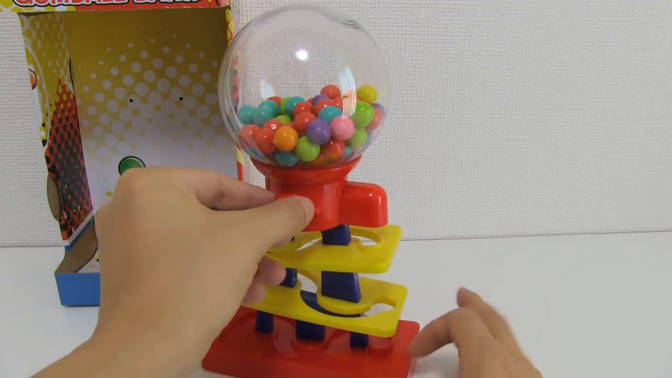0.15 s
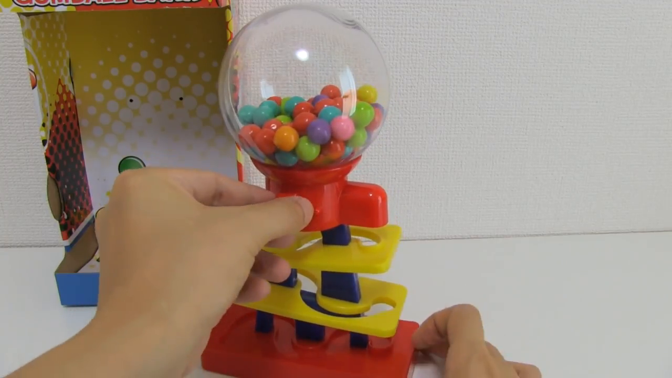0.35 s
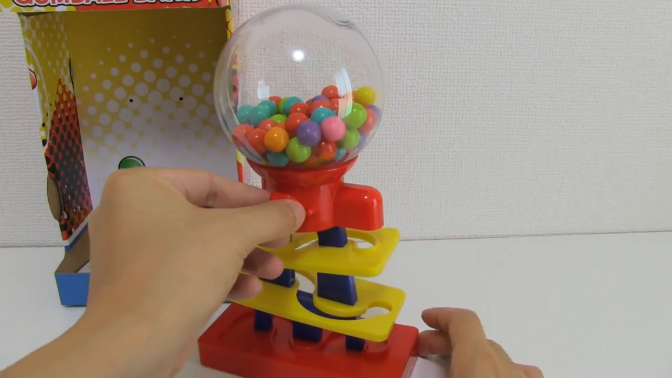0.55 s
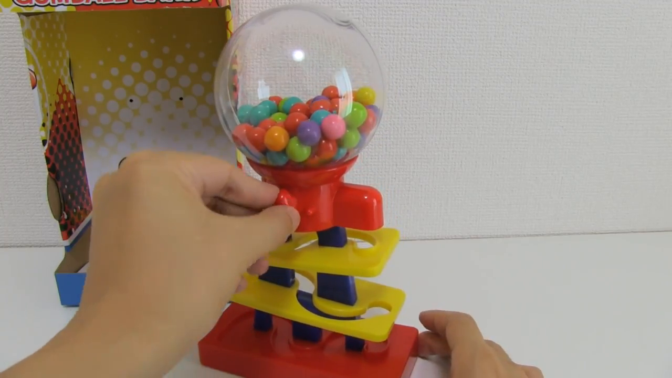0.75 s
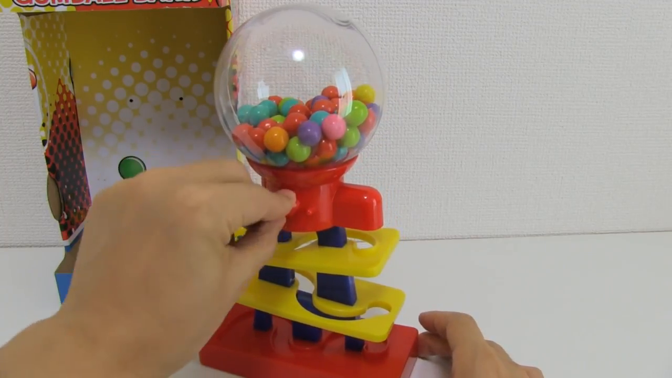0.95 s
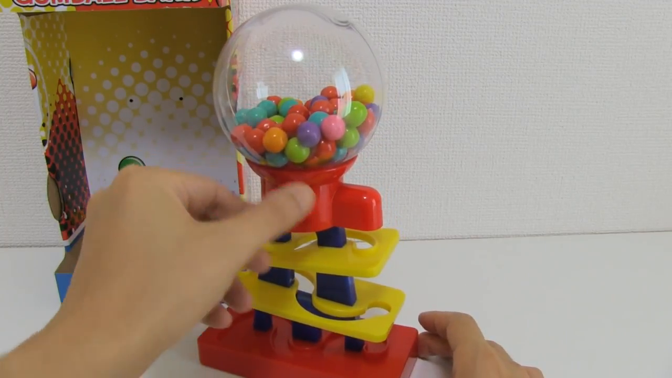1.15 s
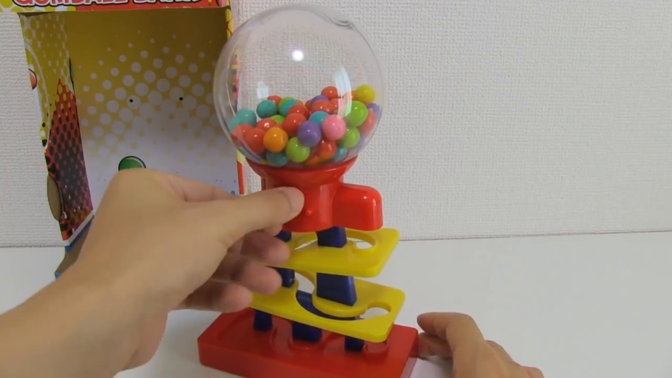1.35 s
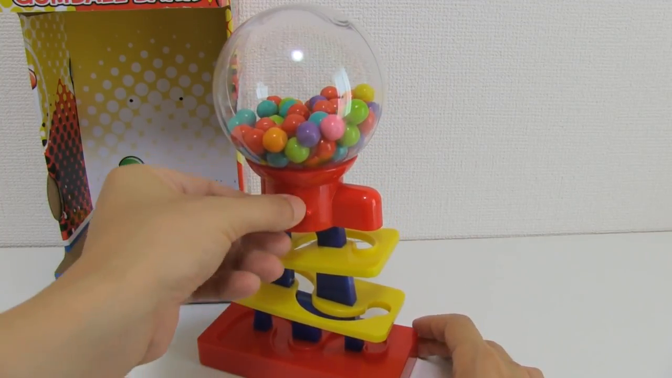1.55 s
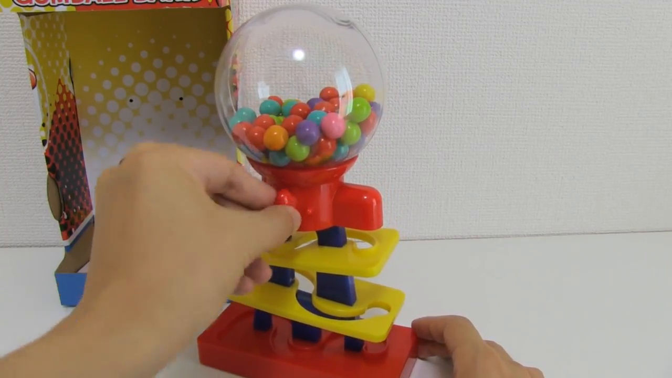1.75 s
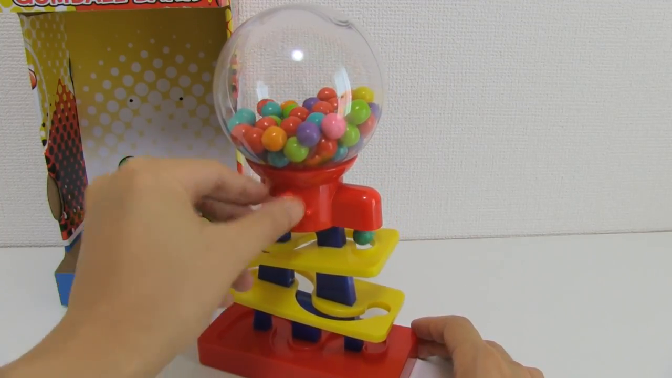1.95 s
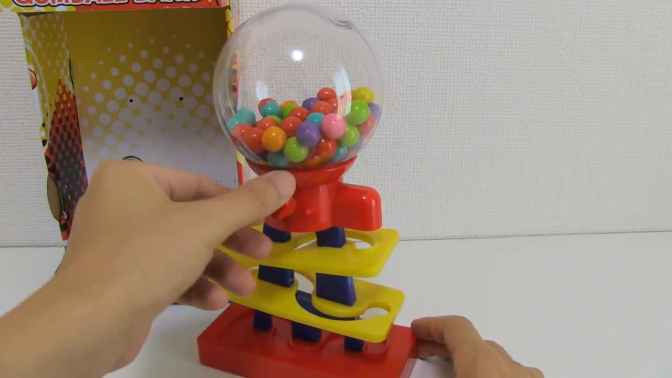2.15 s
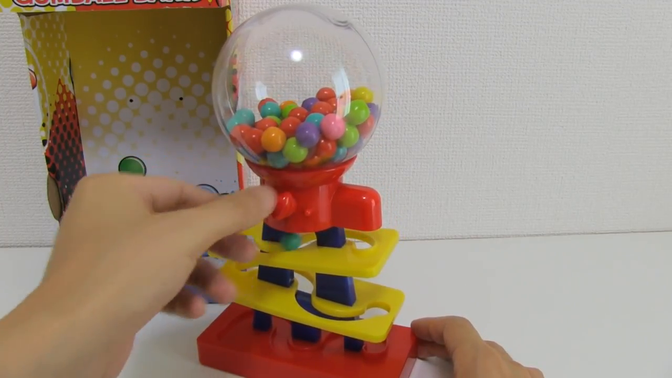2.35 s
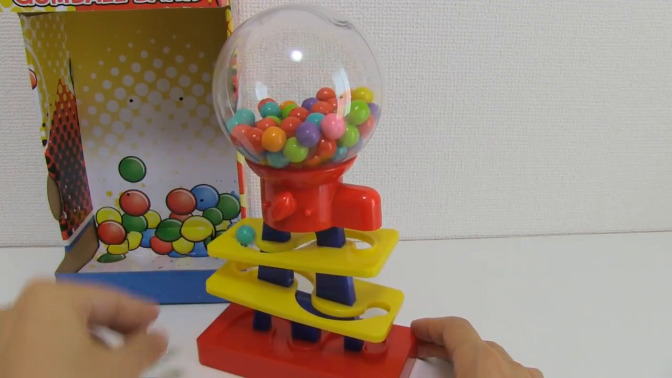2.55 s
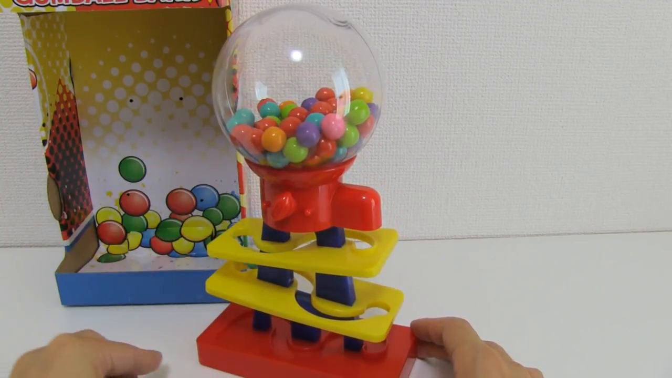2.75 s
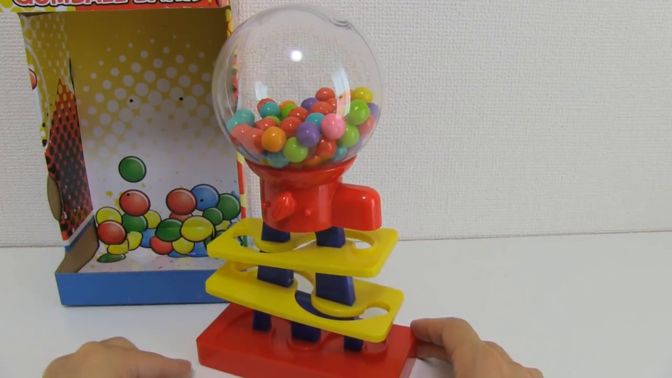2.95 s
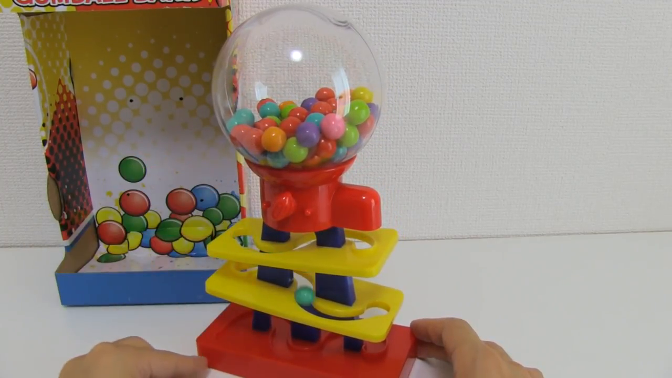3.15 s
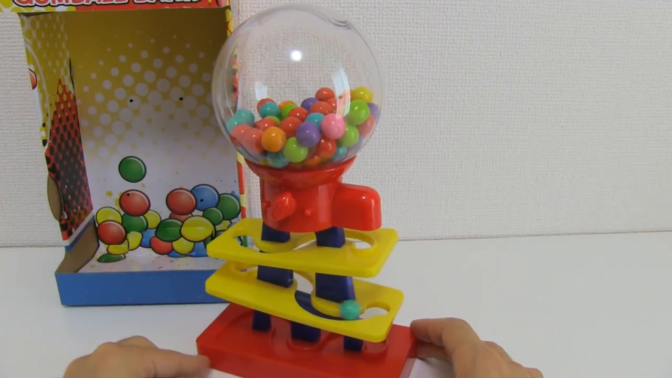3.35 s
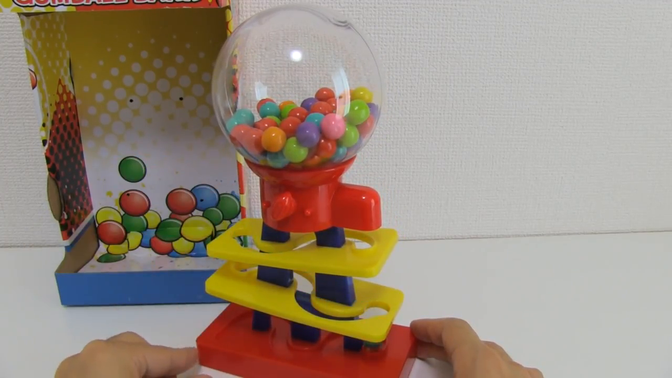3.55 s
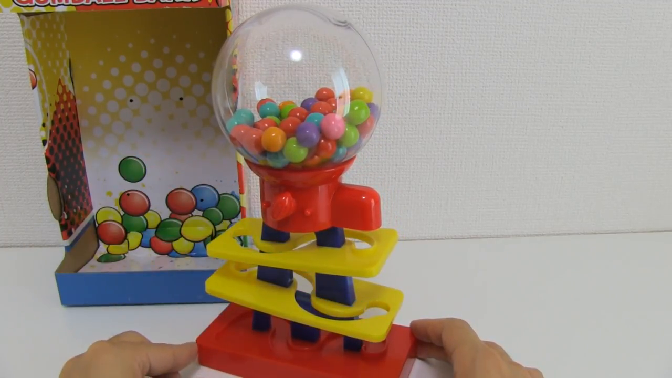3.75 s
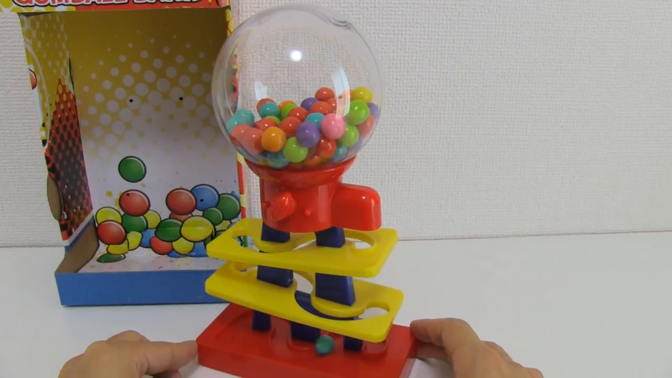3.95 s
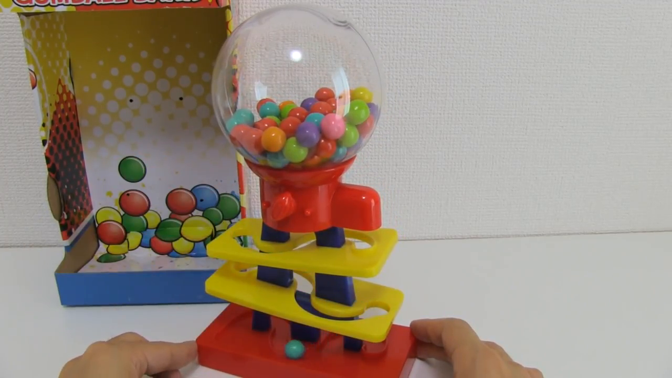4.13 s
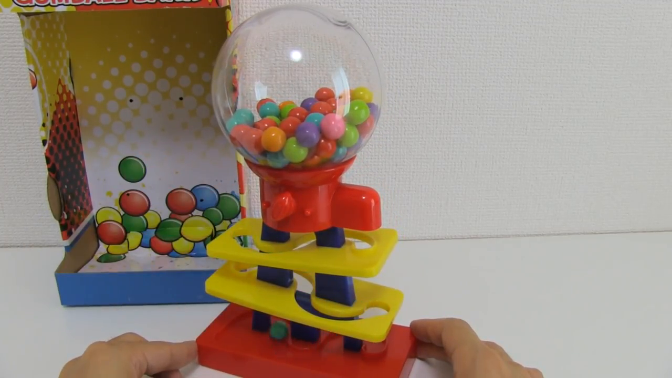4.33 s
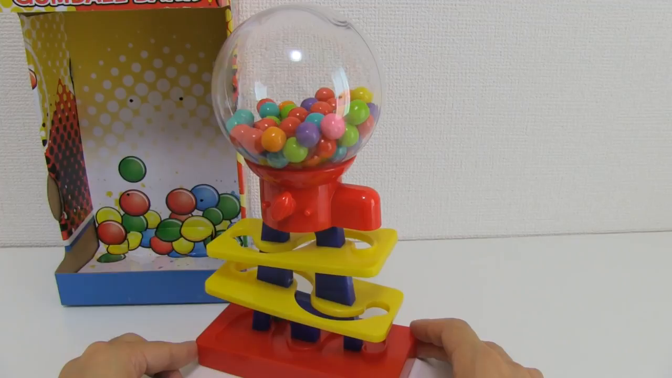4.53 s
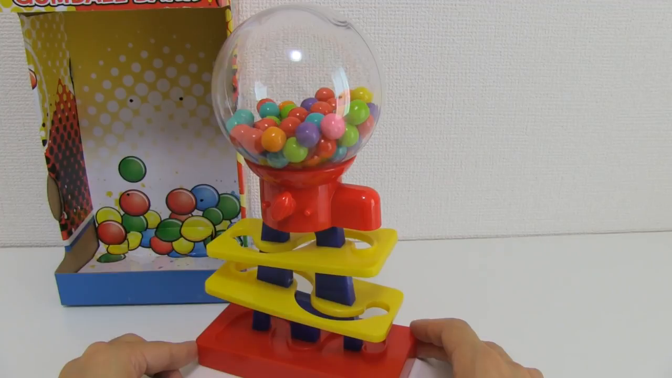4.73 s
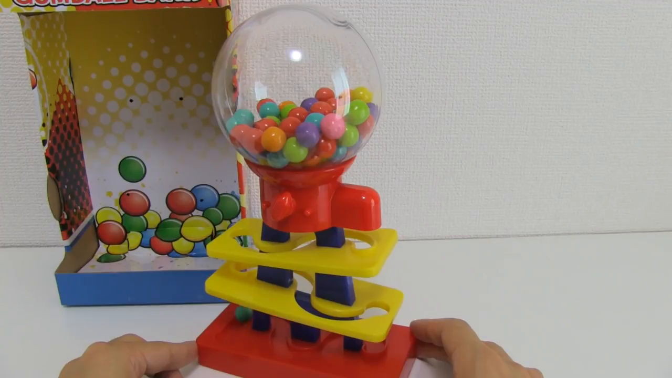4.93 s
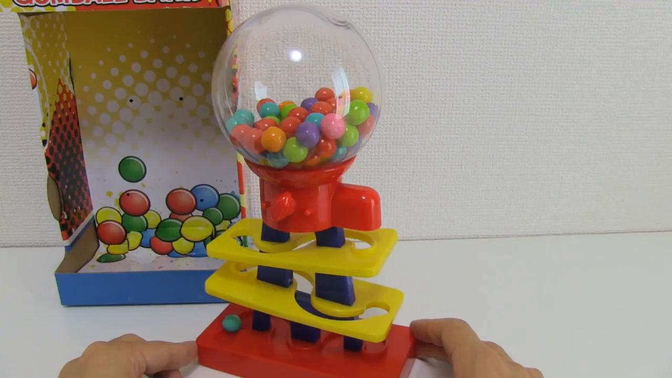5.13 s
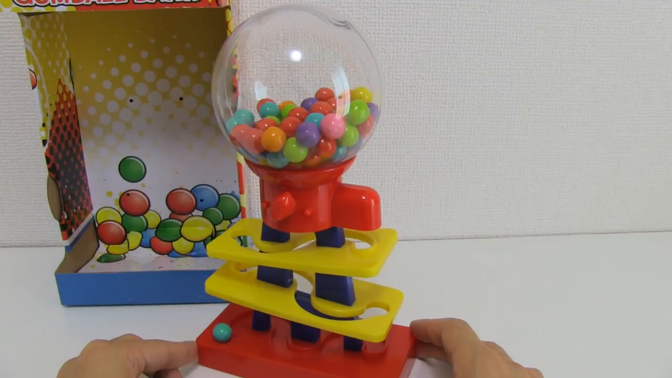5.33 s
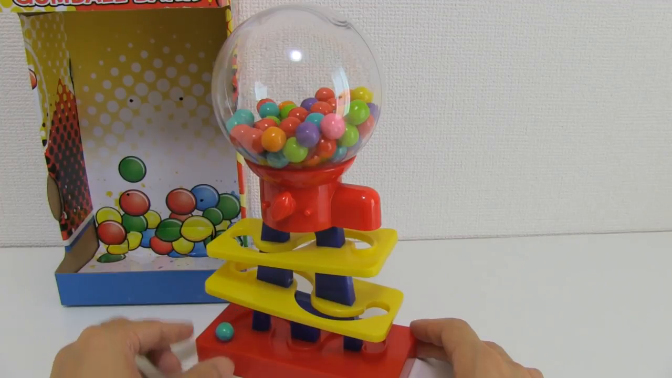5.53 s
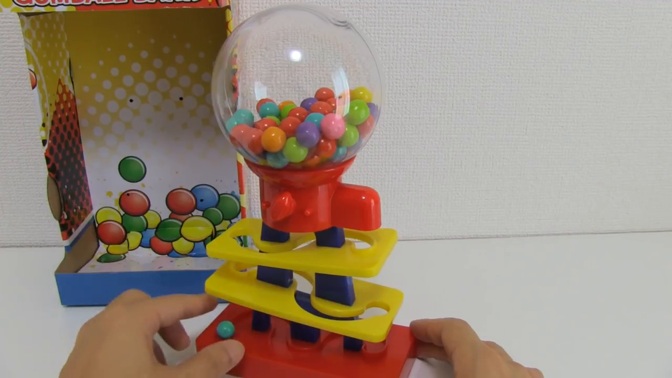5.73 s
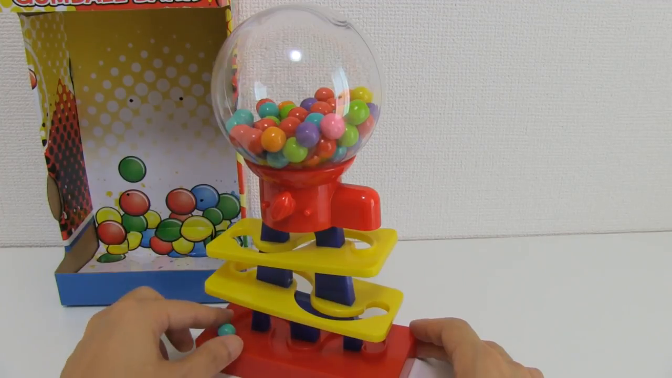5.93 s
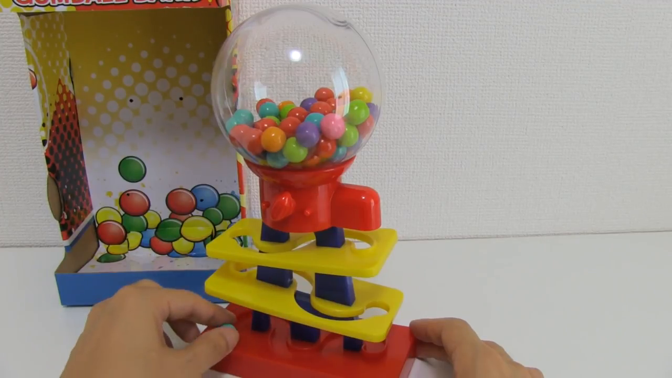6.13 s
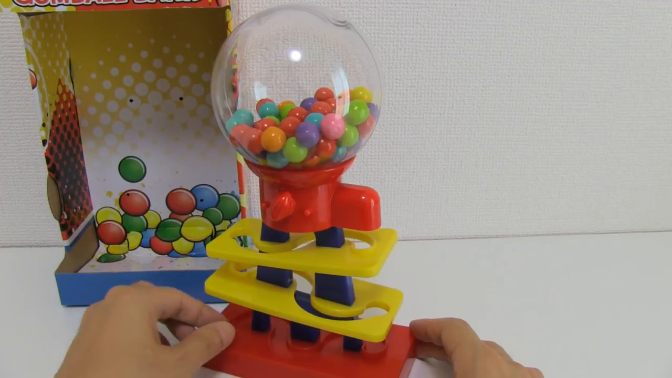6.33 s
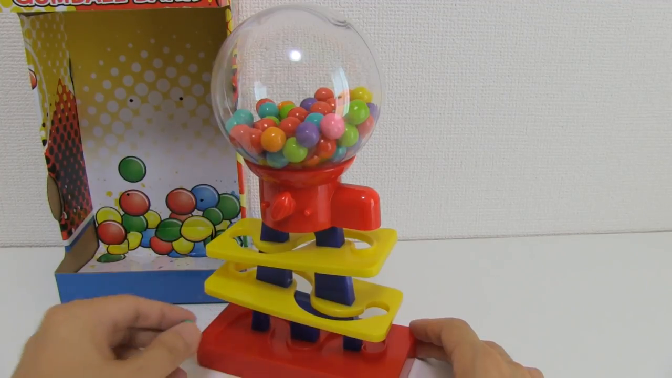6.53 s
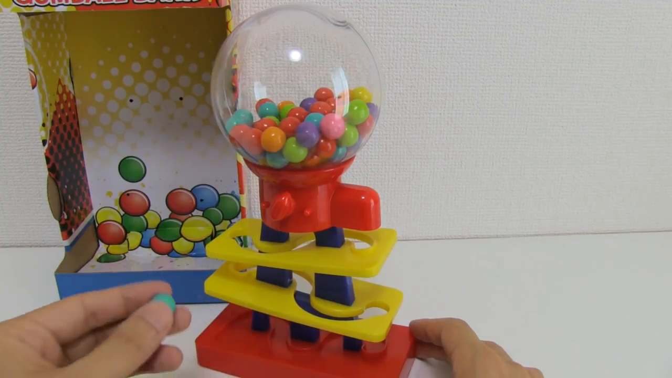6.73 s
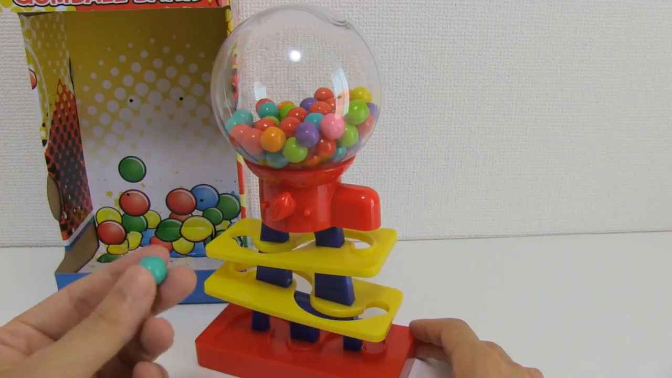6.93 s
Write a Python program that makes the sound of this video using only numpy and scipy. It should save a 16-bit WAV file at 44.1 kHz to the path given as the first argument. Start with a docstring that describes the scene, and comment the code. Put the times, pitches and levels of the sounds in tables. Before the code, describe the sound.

A plastic toy gumball machine is heard close up in a small, fairly dry room, over a soft low rumble. Its knob starts turning with faint ticks and rubbing. From about 1 second it gives sharp, irregular clicks and scrapes while the balls inside jostle, with the densest burst between 1.8 and 2 seconds. After a few light ticks, one gumball drops onto the plastic spiral ramp with a clack at 2.7 seconds and rolls softly down with small bumps, a faint hum swelling behind it. At 3.5 seconds it lands loudly in the hollow tray, bouncing and rattling as it quickly dies down. From 4 to about 5.6 seconds it rolls quietly, ticking against the floor and rim. At 6 seconds a clearer click and a faint brush of fingers mark the ball being picked out. Little but room noise remains until about 7 seconds.

```python
"""A toy gumball machine

A hand turns the knob of a plastic toy on a table: the gate scrapes, clicks and stirs the balls. One ball
drops onto the spiral ramp, rolls down, bounces into the base tray, wanders along its rim and is picked
out. Each contact excites the damped modes of a plastic part; a small room answers, over a low rumble."""
import sys
import numpy as np
from scipy import signal
from scipy.fft import rfft, irfft
from scipy.io import wavfile
from scipy.ndimage import uniform_filter1d

SR = 44100
rng = np.random.default_rng(int(sys.argv[2]) if len(sys.argv) > 2 else 0)


def waveform_to_disk(signal):
    """Save audio, clipped to [-1, 1], as 16-bit WAV at the path in sys.argv[1]."""
    frames = np.transpose(np.atleast_2d(signal))
    scaled = np.clip(frames, -1, 1) * 32767
    samples = np.round(scaled).astype(np.int16)
    wavfile.write(sys.argv[1], SR, samples)


N = 312562
TIME = np.arange(N) / SR


def undb(db):
    """Amplitude ratio of a level in decibels."""
    return 10 ** (np.asarray(db) / 20)


def rms(x):
    """Root-mean-square amplitude along time."""
    return np.sqrt(np.mean(x ** 2, axis=-1, keepdims=True)) + 1e-12


def unit_onset(blows):
    """Normalisation of each blow to rms 1 over its first 6 ms."""
    return blows / rms(blows[:, :int(.006 * SR)])


def cut(x, hz, kind, order=3):
    """Butterworth filtering along time."""
    return signal.sosfilt(signal.butter(order, np.minimum(hz, .45 * SR), kind, fs=SR, output="sos"), x)


def coloured(spectrum):
    """Spectral shaping of white noise by (f/Hz, level/dB) points; rms 1."""
    hz, db = np.transpose(spectrum)
    f = np.maximum(np.fft.rfftfreq(N, 1 / SR), 1)
    gain = undb(np.interp(np.log(f), np.log(hz), db))
    noise = irfft(rfft(rng.standard_normal(N)) * gain, N)
    return noise / rms(noise)


def stereo(mid, side):
    """Sum and difference give the left and right channels."""
    return np.array([mid + side, mid - side])


def swell(peak_s, length_s):
    """Gaussian envelope; the length lies between its 1/e points."""
    return np.exp(-(2 * (TIME - peak_s) / length_s) ** 2)


def decay(t, t60):
    """Exponential damping by 60 dB in t60 seconds."""
    return np.exp(-np.log(1000) * t / t60)


def movements(rows, attack_s, release_db_per_s, build_db=0):
    """Envelope of driven motion: linear onset, a rise of build_db to the end, then exponential decay."""
    envelope = 0
    for start, length, db in rows:
        age = TIME - start
        onset = np.clip(age / attack_s, 0, 1)
        to_go = np.clip(1 - age / length, 0, 1)
        since_end = np.maximum(age - length, 0)
        envelope += onset * undb(db - build_db * to_go - release_db_per_s * since_end)
    return envelope


def modal_rings(modes, count, scatter_db, detune, crack_db, crack_s, crack_hz):
    """Modal superposition: each contact reweights and detunes the modes; dense high modes form a crack."""
    t = np.arange(SR // 12) / SR
    hz, db, t60 = np.transpose(modes)
    size, shift, sign = rng.standard_normal((count, 3, len(hz))).transpose(1, 0, 2)
    weights = np.sign(sign) * undb(db + scatter_db * size)
    pitch = hz * (1 + detune * shift)
    body = sum(weights[:, [k]] * np.sin(2 * np.pi * pitch[:, [k]] * t) * decay(t, t60[k])
               for k in range(len(hz)))
    burst = rng.standard_normal((count, len(t))) * np.exp(-t / crack_s)
    crack = undb(crack_db) * cut(burst, crack_hz, "low", order=1)
    return cut(body + crack, 250, "high", order=4)  # so small a part radiates almost no bass


def impacts(hits, rings, thud_db, snap_db, spot_db, rebound_s, rebound_db, gain_db=0):
    """Impact excitation: a stronger blow has a shorter contact, so it thuds less and snaps more."""
    thud_hz, snap_hz, medium_blow_db = 1400, 5000, -30
    thud_loss, snap_gain = .46, .2  # dB per dB above a medium blow
    times, db, hardness_db, hollowness_db, spot_hz = np.transpose(hits)
    t = np.arange(rings.shape[1]) / SR
    lags = np.cumsum(rebound_s * rng.uniform(.4, 1.6, (len(times), 3)), axis=1)  # three rebounds a blow
    shell = rings.copy()
    for k, row in enumerate(lags):
        for bounce, lag in enumerate(row, start=1):
            rebound = np.pad(rings[k - bounce], (int(lag * SR), 0))[:len(t)]
            shell[k] += undb(bounce * rebound_db) * rebound
    spot = np.sin(2 * np.pi * spot_hz[:, None] * t) * decay(t, t60=.012)
    middle = unit_onset(cut(shell, [thud_hz, snap_hz], "band", order=4))
    clack = unit_onset(middle + undb(spot_db) * unit_onset(spot))
    thud = unit_onset(cut(shell, thud_hz, "low", order=6))
    treble = cut(shell, snap_hz, "high", order=6)
    snap = unit_onset(cut(treble, 15100, "low", order=2))  # plastic and sugar are too soft for the top
    force_db = db - medium_blow_db
    thud *= undb(thud_db - thud_loss * force_db + hollowness_db)[:, None]
    snap *= undb(snap_db + snap_gain * force_db + hardness_db)[:, None]
    blows = (thud + clack + snap) * undb(db + gain_db)[:, None]
    out = np.zeros(N + len(t))
    for start, blow in zip((times * SR).astype(int), blows):
        out[start:start + len(t)] += blow
    return out[:N]


def chatter(rings, per_s, grit_db, soft_hz):
    """Shot noise: tiny random contacts of uneven force excite several spots of a part; rms 1."""
    spurts = uniform_filter1d(rng.standard_normal(N), SR // 120)
    force = undb(grit_db * spurts / rms(spurts))
    out = 0
    for ring in rings:
        touches = rng.random(N) < per_s / len(rings) / SR
        out += signal.oaconvolve(touches * force * rng.exponential(size=N), ring)[:N]
    out = cut(out, soft_hz, "low", order=2)
    return out / rms(out)


# spectra of the room air and of the rumble: f/Hz, relative level/dB
AIR_SPECTRUM = [(18, -53), (30, -18.5), (48, -27.5), (81, -13.5), (112, -4.5), (194, -20), (273, -12),
                (569, -18.5), (616, -19.5), (780, -23), (1160, -20.5), (2750, -32), (11400, -41),
                (16000, -42)]
RUMBLE_SPECTRUM = [(18, -44.5), (30, -18.5), (54, -7), (135, -2), (172, -5.5), (225, -8.5), (258, -6.5),
                   (324, -15), (450, -16), (580, -42.5), (990, -120)]
# swells of the rumble: peak t/s, length/s, relative level/dB
RUMBLE_SURGES = [(.02, 0.34, -48), (.35, 0.36, -51.5), (.9, 0.29, -57), (2.61, 0.11, -54),
                 (3.05, 0.63, -59), (1.6, 1.1, -62), (6.8, 1.2, -67.5)]


def background():
    """Ambient noise: steady air, an amplitude-modulated rumble and a narrow band heard as a hum."""
    air = stereo(coloured(AIR_SPECTRUM), .63 * coloured(AIR_SPECTRUM))
    air *= undb(-57) / rms(cut(air[0], 300, "high"))
    heave = undb(-61.5) + sum(undb(db) * swell(peak, length) for peak, length, db in RUMBLE_SURGES)
    rumble = undb(4) * heave * stereo(coloured(RUMBLE_SPECTRUM), .35 * coloured(RUMBLE_SPECTRUM))
    hum_hz = 146.6
    band = cut(rng.standard_normal(N), [hum_hz - 1.3, hum_hz + 1.3], "band", order=2)
    hum = undb(-51.5) * swell(peak_s=2.87, length_s=2.1) * band / rms(band)
    return air + (rumble + hum) * undb([[-.7], [.7]])


# modes of the gate: f/Hz, level/dB, T60/s
GATE_RESONANCES = [(280, -16.5, .06), (530, -13, 0.036), (770, -9, 0.032), (993, -5, 0.023),
                   (1214, -4.5, 0.018), (1940, -1.5, .012), (2956, 3.5, .011), (3788, 0.5, 0.012),
                   (5670, -5.5, .011), (6894, -8, .011), (8740, -7.5, .011)]
# gate clicks and ball knocks: t/s, relative level/dB, hardness/dB, hollowness/dB, struck spot f/Hz
GATE_IMPACTS = [(0.1573, -38, 2.5, -6.5, 2530), (0.5357, -63, 0, 10.5, 1500),
                (0.6119, -45.5, -4, 0.5, 1880), (0.6988, -47, 3, 3.5, 3700), (0.846, -42.5, 3, -10, 3750),
                (0.929, -34, -8, -2, 3300), (0.9599, -34, 1.5, -7.5, 3940), (0.9741, -29, 3, -7.5, 2780),
                (0.9841, -13.5, 1.5, 3, 2890), (1.0026, -35, 3.5, -9.5, 3100),
                (1.0243, -13.5, 0.5, -4.5, 3040), (1.0426, -26.5, -0.5, -12.5, 2950),
                (1.1643, -18.0, -2, -4, 3030), (1.1682, -21.5, 6, -13.5, 3910),
                (1.1986, -26.5, -3.5, -4, 3230), (1.252, -32, -20, -13.5, 3050),
                (1.3217, -21, -10.5, -12.5, 3930), (1.3749, -23, 1.5, 1.5, 3070),
                (1.3976, -31, -11, -15.5, 3720), (1.4517, -27.0, -1.5, -0.5, 4040),
                (1.4899, -31.5, 1.0, -3, 4000), (1.5111, -32.5, -2.5, -0.5, 4070),
                (1.5271, -35, 2, -11.5, 3940), (1.5903, -39.5, 4.5, -6.5, 4300),
                (1.637, -37.5, -6, 3, 2740), (1.6423, -28, -8.5, -6, 2950), (1.7133, -37, 9.5, -0.5, 3000),
                (1.7299, -29, -3, -5.5, 3160), (1.8107, -15, 6.5, -11.5, 2880),
                (1.8264, -19.5, 4, -6, 3060), (1.859, -31, -2, -8.5, 2910),
                (1.8874, -36.5, 20.5, 7.5, 1510), (1.9066, -15.0, 8.5, 2.5, 3100),
                (1.9123, -18.5, 9.5, 10, 2490), (1.9276, -18.5, 11, -15.5, 4140),
                (1.9425, -19, 9.5, 1, 1980), (1.9503, -22.5, 0.5, -6.5, 3720),
                (1.9616, -12, -5.5, -3.5, 3750), (1.9689, -15, 1.5, -4, 3010),
                (1.9794, -19, 5.5, 7.5, 4200), (2.0154, -29.5, 6, 6, 3980), (2.0284, -31.5, 6, -3, 3830),
                (2.1553, -38, 2.5, 0.0, 3000), (2.237, -37.5, -8, 5, 1490), (2.2681, -35.0, -4, -6.5, 2940),
                (2.392, -43.5, -5, 3.5, 2900)]
# twists of the knob: start t/s, length/s, relative level/dB
KNOB_TWISTS = [(-.1, 0.27, -48), (.4, 0.3, -58.5), (.68, 0.05, -46), (.82, 0.19, -41), (1.18, 0.11, -48.5),
               (1.34, 0.27, -43.5), (1.6, .16, -39), (1.82, .17, -28.5), (2.37, 0.047, -53)]


def gate():
    """Stick-slip friction: the knob rubs while its wheel clicks and jostles the balls in the globe."""
    rings = modal_rings(GATE_RESONANCES, len(GATE_IMPACTS), scatter_db=3, detune=.045,
                        crack_db=10, crack_s=.002, crack_hz=4500)
    rub = chatter(rings[:10], per_s=1100, grit_db=3, soft_hz=10000)
    jostle = chatter(rings[10:16], per_s=170, grit_db=.5, soft_hz=5006)
    effort = movements(KNOB_TWISTS, attack_s=.02, release_db_per_s=190)
    clicks = impacts(GATE_IMPACTS, rings, thud_db=-4.5, snap_db=-11.5, spot_db=-2,
                     rebound_s=.0018, rebound_db=-7, gain_db=-.26)
    return clicks + undb(-6.5) * effort * (rub + jostle)


# skin brushing the toy and the table: peak t/s, length/s, level/dB, centre f/Hz
FINGER_BRUSHES = [(0.13, 0.17, -72, 9350), (0.482, 0.052, -62.5, 5600), (0.756, 0.45, -70, 9000),
                  (5.546, 0.1, -64.5, 7500), (5.964, 0.063, -55.5, 12400), (6.49, 0.12, -67, 9000)]


def fingers():
    """Sliding friction: skin makes short swells of broadband hiss."""
    out = 0
    for peak, length, db, hz in FINGER_BRUSHES:
        hiss = cut(rng.standard_normal(N), [hz / 1.6, hz * 1.6], "band", order=1)
        out += undb(db) * swell(peak, length) * hiss / rms(hiss)
    return out


# modes of the spiral ramp: f/Hz, level/dB, T60/s
RAMP_RESONANCES = [(500, -8, .018), (750, -8, .03), (1053, -4.5, 0.018), (1320, -9, .022),
                   (2076, 2.5, 0.012), (2830, 5, 0.01), (3640, -3, .013), (4950, -4, .008),
                   (5750, -9.5, 0.0063), (8500, -2.5, 0.0088)]
# drop and bumps on the ramp: t/s, relative level/dB, hardness/dB, hollowness/dB, struck spot f/Hz
RAMP_IMPACTS = [(2.6568, -23, -3, -7, 2150), (2.6896, -13.5, 3, -0.5, 2980), (2.6962, -22.5, -3, -4, 3110),
                (2.8839, -42.5, -10, -3.0, 2990), (2.9273, -47.0, -13, -9.5, 2560),
                (2.958, -41, -17, 4, 2940), (3.0683, -43.5, -11.5, -1.5, 2490),
                (3.0979, -62.5, 2.5, 11.5, 1500), (3.3063, -44.5, -1, -0.5, 2650),
                (3.4967, -22, 0, 1, 3190)]
# flights of the spiral: start t/s, length/s, level at the bottom/dB
RAMP_FLIGHTS = [(2.1, 0.45, -54), (2.8, 0.36, -58.5), (3.2, 0.22, -48.5)]


def ramp():
    """Rolling noise grows with speed on each flight; the ball also bumps and scrapes the outer wall."""
    rings = modal_rings(RAMP_RESONANCES, len(RAMP_IMPACTS), scatter_db=3, detune=.04,
                        crack_db=11, crack_s=.0009, crack_hz=6010)
    roll = chatter(rings[:3], per_s=2100, grit_db=4, soft_hz=1000)
    scrape = chatter(rings[4:8], per_s=900, grit_db=2, soft_hz=4180)
    speed = movements(RAMP_FLIGHTS, attack_s=.04, release_db_per_s=201, build_db=4)
    bend = undb(-52.5) * swell(peak_s=2.7, length_s=.097)
    knocks = impacts(RAMP_IMPACTS, rings, thud_db=-4.5, snap_db=-10.5, spot_db=-3.5,
                     rebound_s=.0024, rebound_db=-8, gain_db=.46)
    return knocks + speed * roll + bend * scrape


# modes of the tray floor: f/Hz, level/dB, T60/s
TRAY_RESONANCES = [(298, -18.5, 0.071), (500, -11.5, 0.024), (752, -9, 0.033), (897, -11, 0.023),
                   (1176, -8.5, 0.027), (1495, -5.5, 0.0088), (2000, 1, .013), (2664, -0.5, 0.014),
                   (3550, -0.5, 0.0083), (4370, -10.5, 0.0076), (6100, -18.5, .008), (8950, -9.5, 0.0086)]
# bounces and hops on the floor: t/s, relative level/dB, hardness/dB, hollowness/dB, struck spot f/Hz
TRAY_IMPACTS = [(3.5399, -10.5, -2.5, -4, 2100), (3.6022, -16.5, -3.5, 0.5, 2000),
                (3.6244, -20, -11, -4.5, 2080), (3.6915, -29.5, -14, -1, 1960),
                (3.7501, -38.5, -12, 1.0, 2580), (3.8191, -42, -7.0, -1.5, 2240),
                (3.8365, -45, -5, 0, 2650), (3.9972, -36, -10, -16.5, 2670), (4.0149, -59, -11.0, 1, 1960),
                (4.0485, -40, -12, -14, 2000), (4.0701, -38, -9, -6, 2090), (4.1207, -37.5, -6.5, 2, 2200),
                (4.2836, -48.5, -8, 0.5, 2090), (4.3216, -41, -8.5, -1.5, 2090),
                (4.3797, -46.5, -0.5, 0, 2070), (4.3958, -47, -3.0, -6, 1740),
                (4.4515, -44.5, -1.5, -1, 2610), (4.5807, -43, -6, 1.5, 2720),
                (4.5877, -43.5, -1, -0.5, 1510), (4.6558, -41.0, -11, -2, 2630),
                (4.6679, -38, -11, 0.5, 2700), (4.6747, -37, -9.0, -1.5, 2650), (4.8128, -41, -15, 1, 2230),
                (4.9175, -47.5, -11, 1, 2130), (5.0266, -51.5, -13.5, 2, 2120)]


def tray():
    """Dissipation: the ball bounces into the hollow base, rattles briefly and rolls to rest."""
    landing_s, rest_s = 3.56, 5.62
    roll_fade_db_per_s, rattle_fade_db_per_s = 11, 68.5
    rings = modal_rings(TRAY_RESONANCES, len(TRAY_IMPACTS), scatter_db=3, detune=.041,
                        crack_db=4, crack_s=.0018, crack_hz=3740)
    moving = (TIME > landing_s) & (TIME < rest_s)
    age = np.maximum(TIME - landing_s, 0)
    roll = chatter(rings[:5], per_s=460, grit_db=4, soft_hz=1300)
    roll *= undb(-47.5 - roll_fade_db_per_s * age)
    rattle = chatter(rings[6:12], per_s=400, grit_db=2.5, soft_hz=2400)
    rattle *= undb(-34 - rattle_fade_db_per_s * age)
    bounces = impacts(TRAY_IMPACTS, rings, thud_db=-5.5, snap_db=-10.5, spot_db=-4.5,
                      rebound_s=.0025, rebound_db=-5.5, gain_db=.6)
    return bounces + moving * (roll + rattle)


# modes of the tray's rim: f/Hz, level/dB, T60/s
RIM_RESONANCES = [(731, -14.5, 0.055), (810, -7, 0.029), (1057, -7, .021), (1316, -10, 0.036),
                  (2090, 6, 0.012), (2710, 5.5, 0.014), (2780, -26, 0.18), (3380, 1.5, 0.0092),
                  (4210, -3.5, 0.008)]
# taps on the rim: t/s, relative level/dB, hardness/dB, hollowness/dB, struck spot f/Hz
RIM_IMPACTS = [(5.1638, -38.5, -6, -1.5, 2070), (5.1885, -40.5, -7, 2.5, 2060),
               (5.2723, -48, -10, 2.5, 2100), (5.3837, -35, -1, -1.5, 1340), (5.4587, -58.5, -2.5, 4, 1150),
               (5.6374, -33.5, -1.5, 1.5, 2714), (5.6447, -32.5, -16, -1, 795),
               (5.9502, -45, -9, 0.5, 2180), (5.9977, -22.5, -2.5, -0.5, 2430),
               (6.2254, -62.5, -4, 4.5, 2260)]


def rim():
    """Free vibration: the rim rings briefly after each tap of the ball."""
    rings = modal_rings(RIM_RESONANCES, len(RIM_IMPACTS), scatter_db=1, detune=.015,
                        crack_db=2, crack_s=.0022, crack_hz=2500)
    return impacts(RIM_IMPACTS, rings, thud_db=-5, snap_db=-11, spot_db=0,
                   rebound_s=.003, rebound_db=-6.5)


def toy():
    """Directional radiation: each call draws the mix of modes heard from one direction."""
    return gate() + ramp() + tray() + rim()


# echoes from table, wall and box: delay t/s, level/dB, left minus right/dB
REFLECTIONS = [(.0013, -24, 8), (.0072, -20, 3), (0.02, -21.5, -1)]


def early_echoes(x):
    """Specular reflection: each nearby surface returns a delayed, weaker copy."""
    out = 0
    for delay, db, pan_db in REFLECTIONS:
        delayed = np.pad(x, (int(delay * SR), 0))[:N]
        out += undb([[db + pan_db / 2], [db - pan_db / 2]]) * delayed
    return out


# reverberation of the room: f/Hz, T60/s, relative level/dB, side-to-mid amplitude ratio
ROOM_BANDS = [(198, 0.49, -2.5, .35), (270, 0.43, 0, .35), (430, 0.37, 0, 0.7), (900, 0.28, 0, 0.6),
              (1960, 0.33, -6.5, 0.7), (3270, 0.29, -4, 0.3), (5000, 0.27, -5, .28),
              (9006, 0.28, -7.5, .22), (15000, 0.15, -12, 0)]


def room(x, wet_db, build_s):
    """Diffuse reverberation: the tail builds up quickly and dies sooner in the treble."""
    t = np.arange(SR * 3 // 4) / SR
    hz, *columns = np.transpose(ROOM_BANDS)
    edges_hz = np.geomspace(100, 17000, 16)
    response = np.zeros((2, len(t)))
    for lo, hi in zip(edges_hz, edges_hz[1:]):
        t60, db, width = (np.interp(np.log(lo * hi) / 2, np.log(hz), column) for column in columns)
        mid, side = cut(rng.standard_normal((2, len(t))), [lo, hi], "band")
        response += undb(db + wet_db) * stereo(mid, width * side) * decay(t, t60)
    response *= 1 - np.exp(-t / build_s)
    return signal.oaconvolve(x[None], response, axes=1)[:, :N]


def scene():
    """Superposition: the toy's front gives the direct sound, its two sides the reverberant field."""
    front = toy() + fingers()
    reverberation = sum(room(toy(), wet_db=-35, build_s=.004) for _ in range(2))
    return (front + early_echoes(front) + reverberation) * undb([[.25], [-.25]]) + background()


def record(dry):
    """Band limiting and saturation: the microphone drops deep bass, rounds peaks and cuts the top."""
    x = cut(dry, 38, "high", order=2)
    rounded = x / (1 + np.abs(x / 1.05) ** 6) ** (1 / 6)
    return signal.sosfilt(signal.ellip(10, .2, 80, 15850, fs=SR, output="sos"), rounded)


dry = scene()
out = record(dry)
waveform_to_disk(out)
```